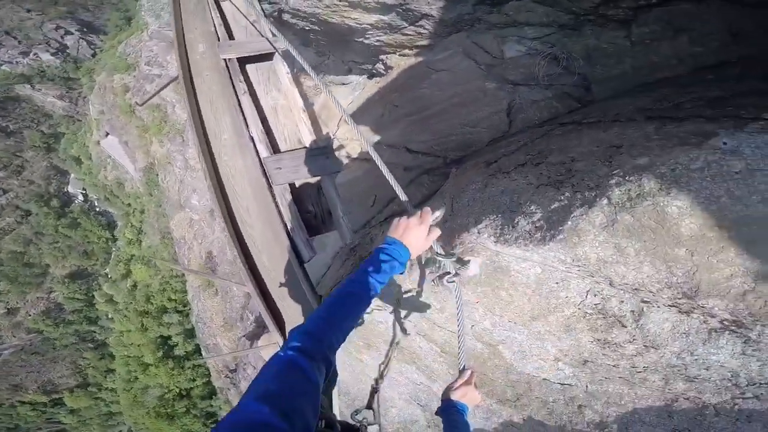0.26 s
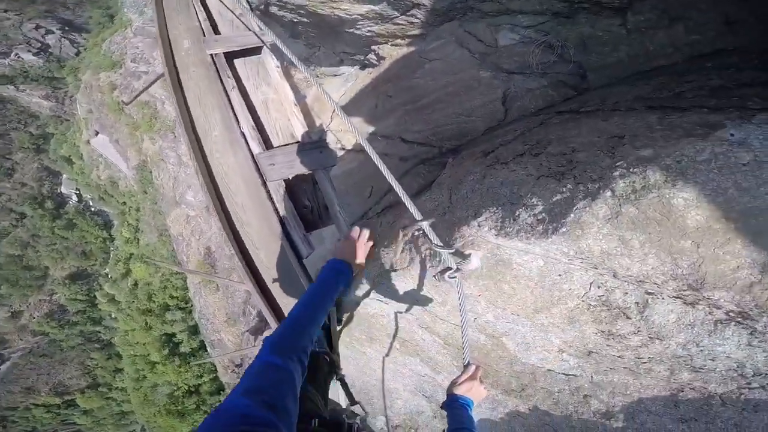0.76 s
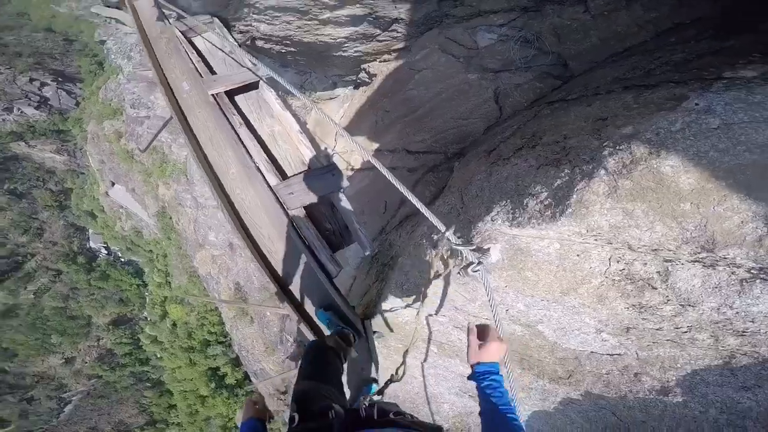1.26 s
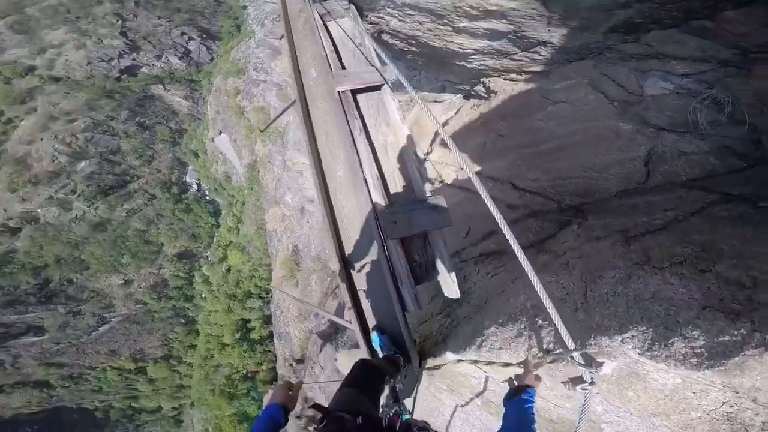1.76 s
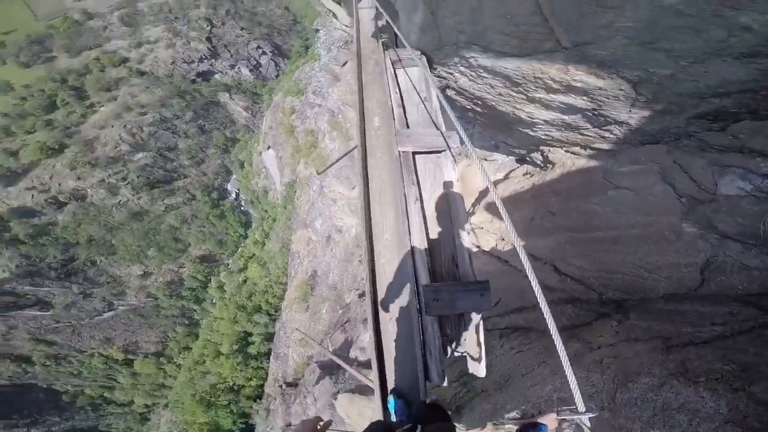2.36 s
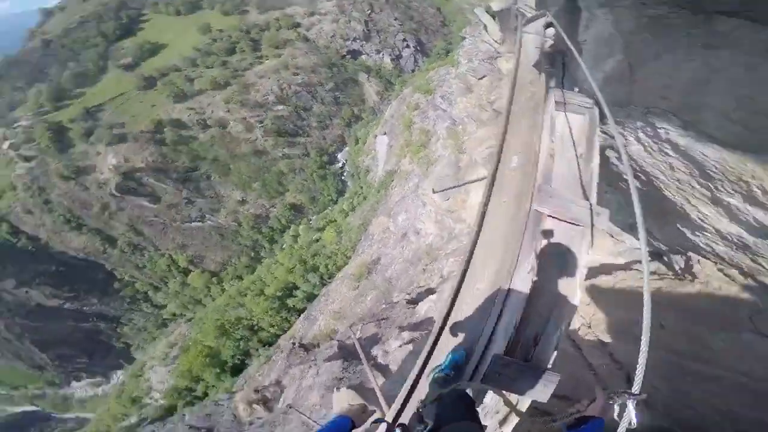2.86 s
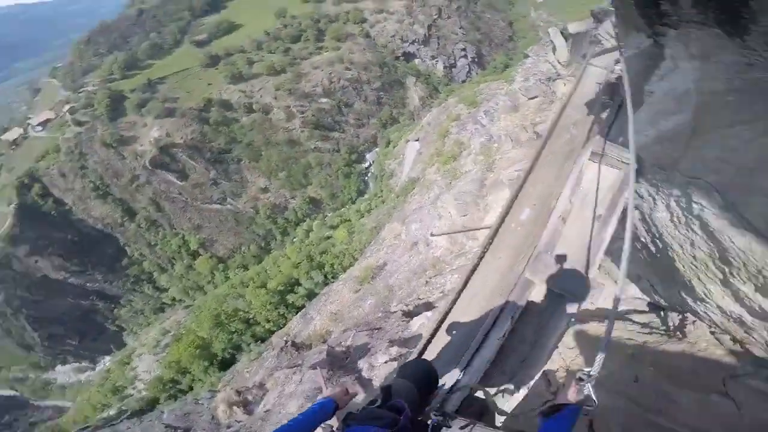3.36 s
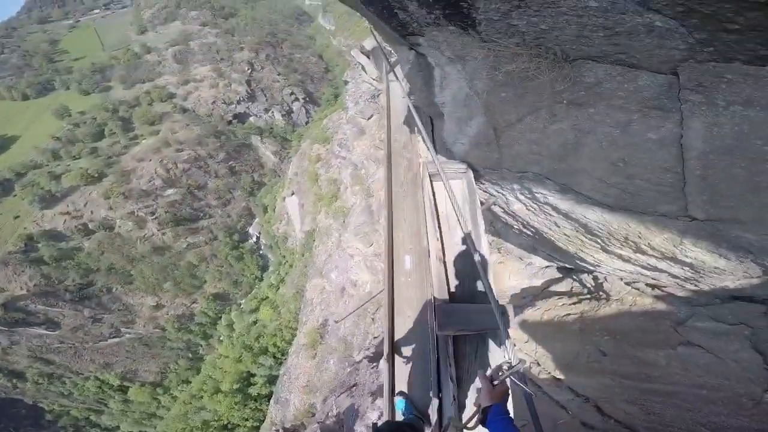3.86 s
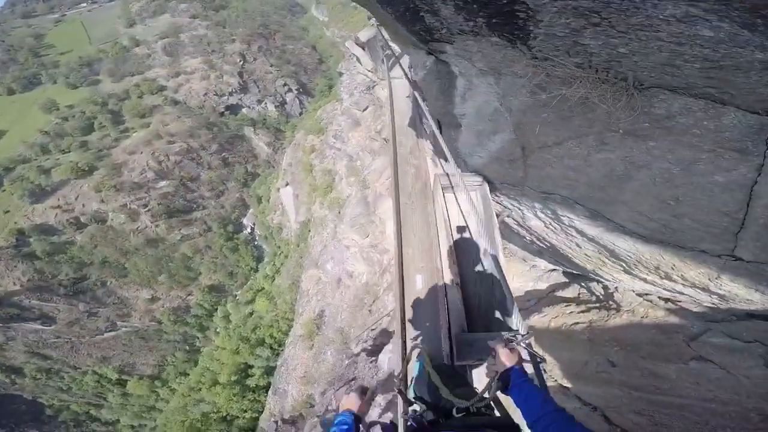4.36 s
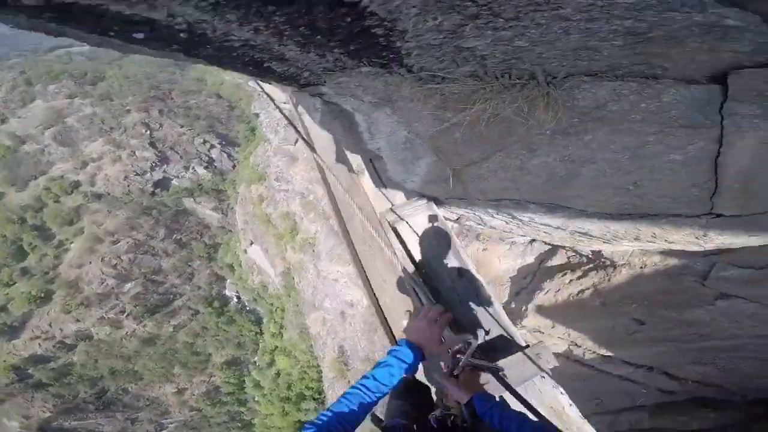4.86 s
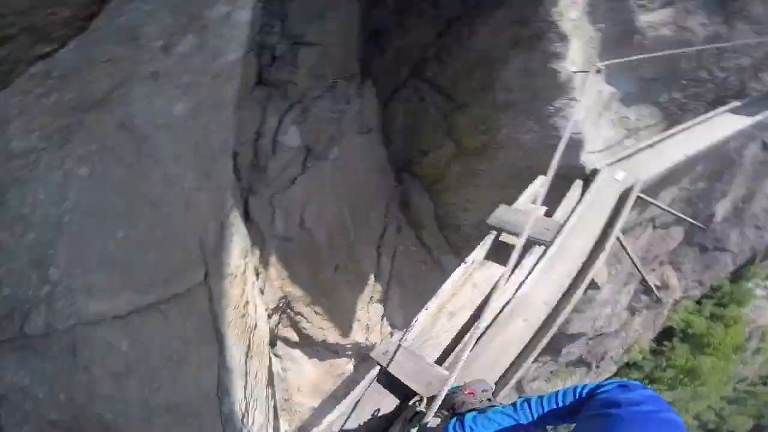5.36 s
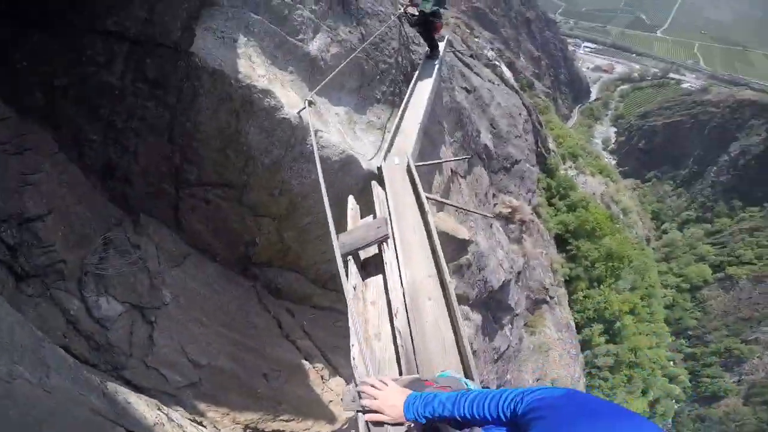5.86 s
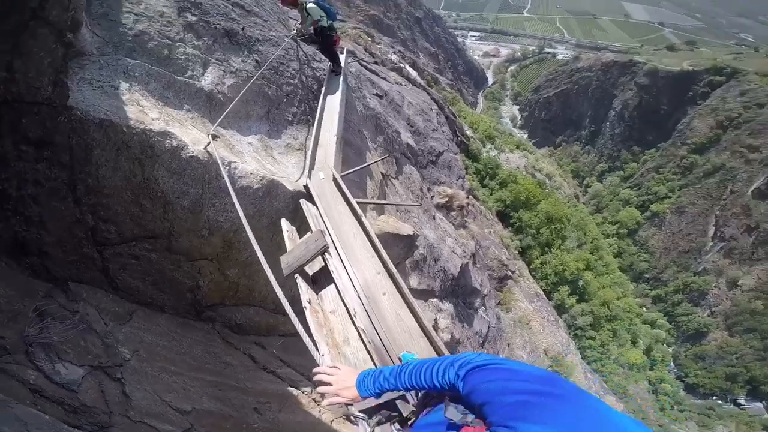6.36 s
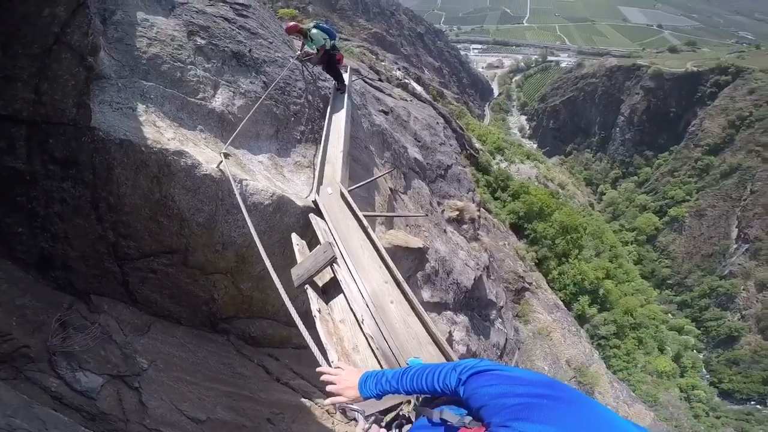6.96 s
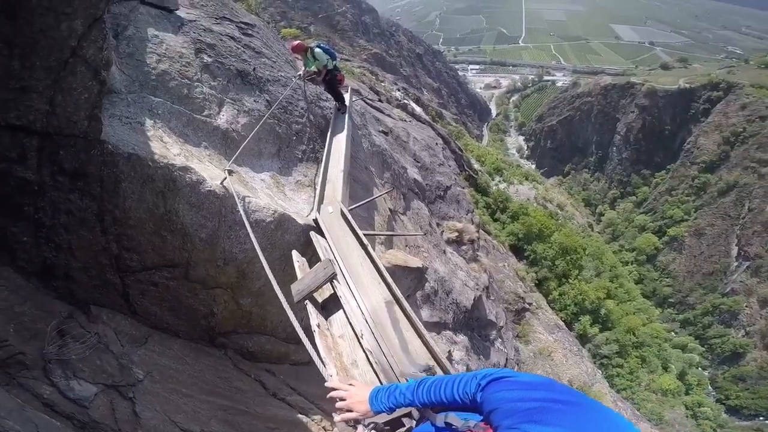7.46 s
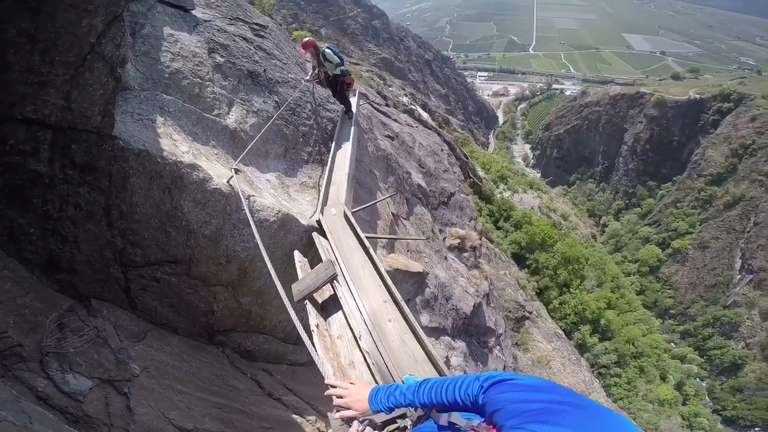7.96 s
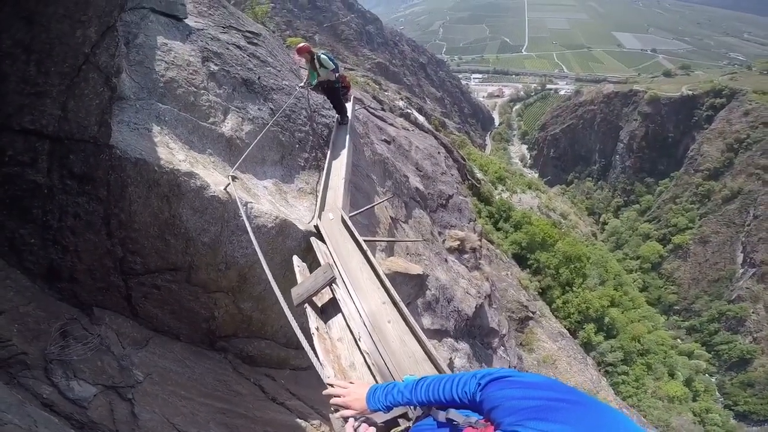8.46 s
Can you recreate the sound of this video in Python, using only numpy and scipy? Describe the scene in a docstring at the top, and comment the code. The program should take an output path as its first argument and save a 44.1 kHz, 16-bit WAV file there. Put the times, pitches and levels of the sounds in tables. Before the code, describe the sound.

Close metal clinks and webbing rustle, a buzzing, ticking scrape of a carabiner along wire cable, then sparse jingling over faint valley hiss.

```python
"""Valley hiss from far below and a rustle of webbing, then carabiners clink at an anchor close by.
A climber edges along planks on a cliff, clipped to a steel cable, heard from a small cased helmet camera.
The metal is dragged along the cable, sings and ticks over its strands, then jingles to rest.
Blows are decaying modes and coloured noise; rubbing is random tiny slips given a spectrum or resonances.
Wind, sway and hiss are shaped noise; boots scuff, land and squeak on the planks."""
import sys
import numpy as np
from scipy import signal
from scipy.fft import rfft, irfft, next_fast_len
from scipy.io import wavfile

SR = 44100
rng = np.random.default_rng(int(sys.argv[2]) if len(sys.argv) > 2 else 0)


def waveform_to_disk(signal):
    """Save audio, clipped to [-1, 1], as 16-bit WAV at the path in sys.argv[1]."""
    frames = np.transpose(np.atleast_2d(signal))
    scaled = np.clip(frames, -1, 1) * 32767
    samples = np.round(scaled).astype(np.int16)
    wavfile.write(sys.argv[1], SR, samples)


N = 384552
TIME = np.arange(N) / SR

# strands passed by the carabiner hanging loose on the cable: (time [s], speed [strands/s])
LOOSE_SPEED = [(2.2, 38.8), (2.27, 20.1), (2.42, 42), (2.56, 38.7), (2.8, 46.9), (3.61, 37.3)]
# how hard it bears on the cable, hanging loose, then pushed by hand:
# (time [s], mean bright tick peak [dB], mean clack peak [dB], grind level [dB])
LOOSE_BEARING = [(2.2, -56, -66, -75), (2.33, -53, -65, -64), (2.39, -44, -62, -58.5),
                 (2.52, -40.5, -60, -56.5), (2.68, -46, -44, -62), (2.95, -48, -60, -61.5),
                 (3.1, -55, -66, -65), (3.42, -55, -64, -63.5), (3.62, -48, -57, -59)]
PUSHED_BEARING = [(3.62, -47, -62, -59), (3.82, -35.5, -54, -54), (3.93, -41, -56, -56),
                  (3.97, -34, -42, -56), (4.12, -47, -46, -54.5), (4.25, -44.5, -47, -55),
                  (4.31, -37, -49, -53.5), (4.57, -39, -31.5, -55), (4.73, -43, -33.5, -62),
                  (4.79, -47, -47, -66), (4.87, -50, -52, -73)]
# spectrum of steel rubbing on the wires: (frequency [Hz], relative density [dB])
GRIND_SPECTRUM = [(1200, -18), (2450, 4.5), (3100, 1), (4100, 4.5), (4700, -7), (5800, -2), (6250, -6.5),
                  (6750, 0), (7700, -3), (9000, -10), (10000, -6.5), (11300, -18), (12500, -17),
                  (13300, -11), (14200, -19), (15200, -24)]


def from_db(db):
    """Amplitude from decibels."""
    return 10 ** (np.asarray(db) / 20)


def rms_one(x):
    """Scale to rms 1."""
    return x / np.sqrt(np.mean(x ** 2) + 1e-20)


def peak_one(x):
    """Scale to peak 1."""
    return x / (np.max(np.abs(x)) + 1e-12)


def add(out, s, sound):
    """Mix a sound in at a time in seconds."""
    at = max(0, round(s * SR))
    out[at:at + len(sound)] += sound[:N - at]


def level(rows, column=1):
    """Gain that follows a dB column, silent outside its span."""
    rows = np.array(rows)
    return from_db(np.interp(TIME, rows[:, 0], rows[:, column], left=-120, right=-120))


def dying(t, t60):
    """Exponential decay, 60 dB down after t60."""
    return np.exp(-np.log(1000) * t / t60)


def colour(x, spectrum):
    """Give a sound a spectrum, causally (minimum phase); rms 1."""
    size = 2 * next_fast_len(min(len(x), 16384))
    half = size // 2
    hz, db = np.transpose(spectrum)
    f = np.maximum(np.arange(half + 1) * SR / size, 1)
    magnitude = from_db(np.interp(np.log(f), np.log(hz), db))
    # folding the cepstrum onto positive time gives the minimum phase
    cepstrum = irfft(np.log(magnitude), size)
    cepstrum[1:half] *= 2
    cepstrum[half + 1:] = 0
    response = irfft(np.exp(rfft(cepstrum)), size)[:half]
    return rms_one(signal.oaconvolve(x, response)[:len(x)])


def resonate(x, hz, width):
    """One resonance of gain 1 at its peak; width in Hz."""
    return signal.lfilter(*signal.iirpeak(hz, hz / width, SR), x)


def drift(rate):
    """Slow random wander of rms 1, with a new target rate times a second."""
    return rms_one(np.interp(TIME * rate, np.arange(8000), rng.standard_normal(8000)))


def grains(per_s, spread_db, size=N):
    """Tiny slips at random moments, of random sign and uneven strength."""
    happens = rng.random(size) < per_s / SR
    sign = rng.choice([-1, 1], size)
    strength = from_db(spread_db * np.clip(rng.standard_normal(size), -2, 2))
    return happens * sign * strength


def struck(modes, t):
    """Decaying modes with alternating signs; each blow weights them a little differently."""
    hz, db, t60 = np.transpose(modes)
    signs = (-1) ** np.arange(len(hz))
    gains = from_db(db + 2 * rng.standard_normal(len(hz))) * signs
    tones = np.sin(2 * np.pi * np.outer(hz, t)) * dying(t, t60[:, None])
    return peak_one(gains @ tones)


def swells(column):
    """Each move swells up to its peak and dies away a little more slowly; the column picks its level."""
    # the climber's moves: (time of peak [s], swell time [s], sway rumble [dB], scuffing [dB])
    move_table = [(0.14, 0.052, -50.5, -56.5), (0.77, 0.1, -48, -58), (1.37, .04, -56, -54.5),
                  (1.45, .05, -43.5, -52.5), (1.66, 0.16, -56, -61.5), (2.04, 0.099, -54.5, -51),
                  (2.26, 0.064, -44, -52), (2.7, .16, -45.5, -50.5), (2.98, 0.05, -41, -57.5),
                  (3.19, 0.046, -50, -60), (4.37, 0.025, -56, -57), (4.56, .1, -43, -56.5),
                  (5.31, 0.095, -49.5, -60), (5.8, 0.29, -51.5, -68.5), (6.83, 0.15, -50.5, -60.5),
                  (7.059, 0.053, -39, -52.5), (7.296, 0.035, -33.5, -50), (7.41, .04, -40.5, -54.5)]
    fade_ratio = 1.26  # dying away takes this many times the swell time
    moves, t = np.array(move_table), TIME[::64]
    away = (t - moves[:, :1]) / moves[:, 1:2]
    distance = np.sqrt(2) * np.maximum(-away, away / fade_ratio)
    shapes = 1 / np.cosh(np.minimum(distance, 20))
    power = from_db(moves[:, column]) ** 2 @ shapes ** 2
    return np.interp(TIME, t, np.sqrt(power))


def scuffing():
    """How strongly clothes and boots rub: a little all the time, more with each move."""
    fidget_db = -69
    return np.hypot(from_db(fidget_db), swells(3))


def stroke(length):
    """Envelope of one rub: it takes hold, holds, and lets go within a few milliseconds."""
    t = TIME[:SR // 3]
    return (1 - dying(t, 0.026)) * dying(np.maximum(t - length, 0), 0.05)


def valley():
    """The even hiss of the river and air far below: steady noise, coloured by the case."""
    # far hiss as it reaches the cased microphone: (frequency [Hz], relative density [dB])
    hiss_spectrum = [(40, 13), (130, -2.5), (330, -0.5), (480, -2.5), (780, -4), (1100, 5.5), (1450, -1.5),
                     (1740, 6.5), (2050, -3), (2400, 0.5), (3000, -3.5), (4050, -3), (4700, -12.5),
                     (15000, -23)]
    hiss_db = -56.9  # rms
    return from_db(hiss_db) * colour(rng.standard_normal(N), hiss_spectrum)


def wind():
    """A gusty breeze and the sway of each move rumble in the case: low noise with a moving level."""
    # air rumble at the case: (frequency [Hz], relative density [dB])
    rumble_spectrum = [(12, -14.5), (22, 1), (34, 4), (55, -1.5), (80, -8.5), (115, -13), (170, -23),
                       (400, -65)]
    breeze_db, gust_db, gusts_per_s = -62, 3, 8
    breeze = from_db(breeze_db + gust_db * drift(gusts_per_s))
    air = np.hypot(breeze, swells(2))
    return air * colour(rng.standard_normal(N), rumble_spectrum)


def boot_scuffs():
    """Boots scuff with the moves: sparse slips with a low, woody spectrum."""
    # scuffing boots: (frequency [Hz], relative density [dB])
    scuff_spectrum = [(25, -34), (60, -3), (110, 5), (200, 1.5), (330, 3), (430, -2.5), (600, -2),
                      (800, -15), (1500, -9.5), (6000, -60)]
    return scuffing() * colour(grains(900, 2.9), scuff_spectrum)


def footfalls():
    """Boots land on the planks: a dense, quickly dying run of slips, coloured to a thud."""
    # footfalls below the helmet: (time [s], peak [dB])
    step_table = [(0.763, -35), (1.447, -44), (5.416, -43), (7.045, -43), (7.08, -42), (7.293, -35.5)]
    # thud of a landing boot: (frequency [Hz], relative density [dB])
    thud_spectrum = [(25, -14), (60, 0), (110, 5), (230, 1), (330, -7), (520, -9), (800, -23), (2000, -32),
                     (6000, -70)]
    out, t = np.zeros(N), TIME[:SR // 8]
    for s, db in step_table:
        slips = grains(3000, 5, len(t)) * dying(t, 0.066)
        add(out, s, from_db(db) * peak_one(colour(slips, thud_spectrum)))
    return out


def squeaks():
    """Rubber sticks and slips on wood: noise through two equal resonances, a short, rough tone."""
    # soles squeaking on the planks: (time [s], length [s], pitch [Hz], level [dB])
    squeak_table = [(0.759, 0.05, 520, -57), (2.271, .01, 1750, -47), (2.282, 0.043, 1300, -53),
                    (2.29, 0.016, 1960, -54), (7.234, 0.042, 630, -60), (7.326, 0.04, 654, -53),
                    (7.365, 0.048, 600, -55)]
    out = np.zeros(N)
    for s, length, hz, db in squeak_table:
        envelope = stroke(length)
        slips = rng.standard_normal(len(envelope))
        tone = rms_one(resonate(resonate(slips, hz, 140), hz, 140))
        add(out, s, from_db(db) * envelope * tone)
    return out


def knock():
    """A bending wave reaches the case: its highs arrive first, then it settles on a low, damped note."""
    knock_s, peak_db = 5.4138, -31.5
    settled_hz, extra_start_hz, fall_t60_s, note_t60_s = 255, 2700, .0068, .024
    out, t = np.zeros(N), TIME[:SR // 16]
    hz = settled_hz + extra_start_hz * dying(t, fall_t60_s)
    swell = (1 - dying(t, 0.03)) * dying(t, note_t60_s)
    note = np.sin(2 * np.pi * np.cumsum(hz) / SR)
    add(out, knock_s, from_db(peak_db) * peak_one(swell * note))
    return out


def rustling():
    """Cloth fibres catch and slip in clumps; a tug is one sharp snap, and the case rings along."""
    # strokes of cloth and webbing, before the case rings: (time [s], length [s], level [dB])
    stroke_table = [(0.123, 0.063, -56), (0.647, 0.024, -48), (1.43, 0.018, -51), (1.93, 0.06, -55),
                    (1.975, 0.12, -52), (2.205, 0.066, -65), (2.601, 0.031, -45.5), (2.645, 0.045, -43.5),
                    (2.695, 0.03, -47), (2.718, 0.075, -40), (2.806, 0.057, -46.5), (2.944, 0.16, -50),
                    (3.45, 0.06, -59), (6.943, .016, -54.5), (7.288, 0.11, -63), (7.377, 0.038, -49.5),
                    (7.411, 0.042, -47)]
    # sharp tugs in the webbing, before the case rings: (time [s], peak [dB])
    tug_table = [(0.146, -31), (0.3115, -28), (0.657, -35), (1.4471, -27), (2.657, -27), (2.7345, -25),
                 (2.7414, -26), (2.77, -28), (3.0, -27.5), (7.417, -34)]
    # rubbing cloth, then snapping webbing: (frequency [Hz], relative density [dB])
    cloth_spectrum = [(600, -18), (900, -6.5), (1300, -0.5), (1550, -1.5), (1870, 10.5), (2150, 1.5),
                      (2600, 3), (3200, -2.5), (4050, 0), (4450, -20.5), (4900, -17), (9000, -48),
                      (15000, -69)]
    snap_spectrum = [(300, -24), (800, -34), (1200, -2.5), (1870, 0), (2300, 7.5), (3200, 4), (4100, 7.5),
                     (4500, -19), (5000, -33), (15000, -57)]
    case_hz, case_width_hz, case_share = 1866, 28, .45
    rubbing = from_db(-7.5) * scuffing()
    for s, length, db in stroke_table:
        add(rubbing, s, from_db(db) * stroke(length))
    clumps = from_db(1.7 * drift(170))
    out = rubbing * colour(grains(4000, 3.5) * clumps, cloth_spectrum)
    t = TIME[:SR // 32]
    for s, db in tug_table:
        slips = grains(2500, 2, len(t)) * dying(t, .025)
        slips[0] = 3  # the snap itself
        add(out, s, from_db(db) * peak_one(colour(slips, snap_spectrum)))
    return out + case_share * resonate(out, case_hz, case_width_hz)


def strand_times(speed):
    """The moments at which the carabiner drops over the next strand."""
    strands_per_s = np.interp(TIME, *np.transpose(speed), left=0, right=0)
    passed = np.cumsum(strands_per_s) / SR
    return TIME[1:][np.diff(np.floor(passed)) > 0]


def cable_song(slips):
    """Slips feed the narrow resonances of the loosely hanging carabiner."""
    # resonances it sings in: (frequency [Hz], width [Hz], mean relative level [dB])
    resonances = [(4900, 130, -15), (6680, 150, 0), (7550, 220, -11), (10030, 240, -6), (13260, 170, -9.5),
                  (14280, 120, -23)]
    # loudness of the singing close to the helmet: (time [s], rms [dB])
    song_level = [(2.2, -78), (2.33, -63.5), (2.52, -56), (2.68, -57), (2.9, -59.5), (3.14, -65.5),
                  (3.28, -61.5), (3.5, -73)]
    song = np.zeros(N)
    # the contact point wanders round the frame, favouring now one resonance, now another
    for hz, width, db in resonances:
        favour = from_db(db + 2.5 * drift(14))
        song += favour * rms_one(resonate(slips, hz, width))
    sounding = (TIME > song_level[0][0]) & (TIME < song_level[-1][0])
    return level(song_level) * song / np.std(song[sounding])


def sliding():
    """Cable wires rub the carabiner: slips make it sing in bursts while loose, over a broad grind."""
    burst_t60_s, between_db = .025, -16  # each strand sets it off anew; what is left between strands
    bursts = np.full(N, from_db(between_db))
    for s in strand_times(LOOSE_SPEED):
        add(bursts, s, dying(TIME[:SR // 16], burst_t60_s))
    slips = bursts * grains(3000, 4) * from_db(2.8 * drift(130))
    grind = colour(grains(7000, 3) * from_db(2 * drift(130)), GRIND_SPECTRUM)
    grind_level = level(LOOSE_BEARING, column=3) + level(PUSHED_BEARING, column=3)
    return cable_song(slips) + grind_level * grind


def clack(db, t):
    """Short knock of steel on steel: too small to carry bass; soft ones sound lower and vary in pitch."""
    # modes at the pitch of a firm contact: (frequency [Hz], relative level [dB], t60 [s])
    clack_modes = [(1880, -26, 0.058), (2360, -22, 0.0068), (3200, -24, 0.011), (3700, -7, 0.011),
                   (4120, -2.5, 0.011), (4330, -5, 0.0032), (4960, -22.5, 0.024)]
    firm_db, sag_per_db, pitch_scatter = -26, .003, .025  # sag and scatter as shares of the pitch
    low_cut_hz = 1700
    sag = sag_per_db * max(firm_db - db, 0)
    pitch = 1 - sag + pitch_scatter * rng.standard_normal() * (db < firm_db)
    modes = [(hz * pitch, mode_db, t60) for hz, mode_db, t60 in clack_modes]
    r = np.exp(-2 * np.pi * low_cut_hz / SR)
    without_bass = signal.lfilter([1, -2, 1], [1, -2 * r, r * r], struck(modes, t))
    return from_db(db) * peak_one(without_bass)


def strand_ticks(speed, bearing):
    """Each strand gives a few milliseconds of chatter and a small clack as the metal lands."""
    spread_db = 1.8  # from strand to strand
    out, t = np.zeros(N), TIME[:SR // 16]
    release = dying(np.maximum(t - .004, 0), .016) + from_db(-17) * dying(t, .05)
    contact = (1 - dying(t, .005)) * release
    when, bright_db, clack_db, _ = np.transpose(bearing)
    for s in strand_times(speed):
        tick_db = np.interp(s, when, bright_db) + spread_db * rng.standard_normal()
        landing_db = np.interp(s, when, clack_db) + spread_db * rng.standard_normal()
        # no two strands are met alike
        spectrum = [(hz, db + 2 * rng.standard_normal()) for hz, db in GRIND_SPECTRUM]
        chatter = peak_one(colour(grains(12000, 2, len(t)) * contact, spectrum))
        add(out, s, from_db(tick_db) * chatter)
        for delay in (0, rng.uniform(0.00196, 0.0061)):  # the landing and one rebound
            add(out, s + delay, clack(landing_db, t))
    return out


def rattles():
    """Runs of tiny bounces, each a small clack."""
    # carabiner chattering against metal: (time [s], length [s], rms [dB])
    rattle_table = [(0.317, 0.017, -53), (0.589, 0.016, -49), (0.613, 0.0099, -36), (6.1, 0.015, -52),
                    (6.17, 0.05, -50.5)]
    out = np.zeros(N)
    for s, length, db in rattle_table:
        bounces = grains(1500, 5.5, max(int(length * SR), 300))
        one_clack = clack(db + 10, TIME[:SR // 64])  # this level only sets how soft it sounds
        add(out, s, from_db(db) * rms_one(np.convolve(bounces, one_clack)))
    return out


def ring(hz, t, t60):
    """A bending mode of the oval frame: a close pair of tones that beat."""
    split = rng.uniform(40, 140)
    pair = np.sin(2 * np.pi * hz * t) + .5 * np.sin(2 * np.pi * (hz + split) * t)
    return pair * dying(t, t60)


def clinks():
    """Metal on metal: a short clack, a splash scattered by the rock, and the ring of the carabiner."""
    # carabiner blows close to the helmet:
    # (time [s], clack peak [dB], splash reference level [dB], favoured ring [Hz], second ring [Hz])
    blow_table = [(0.311, -20, -60.5, 4870, 8570), (0.4355, -44, -75, 4900, 9870),
                  (0.575, -24, -51, 5000, 8400), (0.606, -14, -38.5, 8600, 5170),
                  (0.6117, -10.5, -44.5, 9720, 5200), (0.6197, -29, -45, 8400, 7870),
                  (0.6432, -26, -56, 4940, 8680), (0.7214, -56, -71, 13400, 6650),
                  (0.845, -34, -54, 4950, 8570), (1.98, -51, -62.5, 8450, 5630),
                  (2.004, -45, -61, 13400, 5800), (2.0352, -54, -58, 9950, 7750),
                  (2.0804, -56, -60.5, 9970, 13400), (2.1214, -52, -64, 10000, 5400),
                  (2.135, -56, -58, 9900, 8450), (3.039, -48, -63, 10200, 5070),
                  (5.1166, -44, -65, 6600, 8200), (5.1402, -48, -66, 7920, 14400),
                  (5.3685, -49, -61.5, 6600, 8500), (5.489, -58, -65, 6600, 8740),
                  (5.5188, -54, -57, 6800, 9400), (5.5867, -44, -68, 6770, 8650),
                  (5.6124, -43, -67.5, 5600, 8550), (6.076, -46, -64.5, 5510, 8600),
                  (6.1749, -33, -60, 6150, 8100), (6.1898, -36, -63, 5890, 8700),
                  (6.2442, -47, -62, 9690, 8180), (6.472, -42, -60, 5570, 10000),
                  (6.566, -37, -51, 5440, 13300), (7.001, -52, -49, 7740, 6000),
                  (7.086, -40, -63, 5230, 8500), (7.106, -44, -63.5, 5750, 8640),
                  (7.154, -40, -62.5, 5410, 8900), (7.1747, -36, -53, 9700, 7400),
                  (7.241, -57, -60, 10000, 5860), (7.3126, -48, -62.5, 5390, 9500),
                  (7.418, -57, -65, 5830, 8550)]
    # splash off the rock, before hardness: (frequency [Hz], relative density [dB])
    splash_spectrum = [(700, -24), (1700, -2), (2800, -7), (3900, 8.5), (4700, -24), (5600, -1),
                       (7000, -5.5), (8000, -5.5), (9800, -6), (11000, -18), (12400, -17), (13200, -5),
                       (14000, -18), (15000, -21)]
    # carabiner modes, before hardness: (frequency [Hz], relative level [dB], t60 [s])
    carabiner_modes = [(1870, -5, 0.29), (3760, -5, 0.06), (3800, -20, 0.14), (4130, -3, 0.056),
                       (4414, -12, .07), (5160, 5, 0.065), (5640, -24, 0.073), (7830, 3, 0.12),
                       (8300, -6, 0.058), (9100, -11, 0.097), (9460, -19, 0.029), (13600, -5, 0.048),
                       (14400, -30, .1)]
    ring_db, second_ring_db, ring_t60_s = 6.5, 1.5, 0.043  # levels above the splash reference
    out, t = np.zeros(N), TIME[:SR // 6]
    splash_decay = dying(t, 0.065) + from_db(-10) * dying(t, 0.088)
    for s, clack_db, splash_db, ring_hz, second_hz in blow_table:
        hardness_db = max(splash_db + 47, 0)  # harder blows reach higher
        spectrum = [(hz, db + hardness_db * (hz > 10500)) for hz, db in splash_spectrum]
        modes = [(hz, db + hardness_db * (hz > 10500), t60) for hz, db, t60 in carabiner_modes]
        splash = colour(rng.standard_normal(len(t)), spectrum) * splash_decay
        rings = from_db(ring_db) * ring(ring_hz, t, ring_t60_s)
        rings += from_db(second_ring_db) * ring(second_hz, t, ring_t60_s)
        bright = from_db(5.5) * splash + from_db(3.5) * struck(modes, t) + rings
        add(out, s, clack(clack_db, t) + from_db(splash_db) * bright)
    return out


def scene():
    """The valley far below, the climber's body at the helmet, and the metal on the cable, as one channel."""
    # strands passed by the carabiner pushed by hand: (time [s], speed [strands/s])
    pushed_speed = [(3.62, 41), (3.78, 48), (3.89, 37.7), (3.96, 45.2), (4.1, 30.3), (4.17, 33.5),
                    (4.25, 26), (4.41, 25.3), (4.49, 38.7), (4.84, 17.5)]
    body = wind() + boot_scuffs() + footfalls() + squeaks() + knock() + rustling()
    ticks = strand_ticks(LOOSE_SPEED, LOOSE_BEARING) + strand_ticks(pushed_speed, PUSHED_BEARING)
    metal = sliding() + ticks + rattles() + clinks()
    return (valley() + body + metal)[None]


def record(dry):
    """The top is cut steeply by an elliptic low-pass."""
    cutoff_hz = 15500
    low_pass = signal.ellip(10, .2, 80, cutoff_hz, fs=SR, output="sos")
    return signal.sosfilt(low_pass, dry)


dry = scene()
out = record(dry)
waveform_to_disk(out)
```